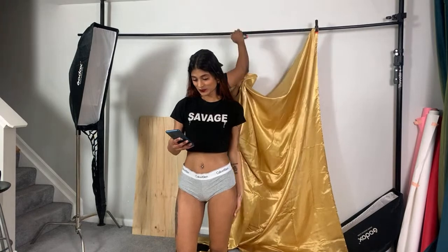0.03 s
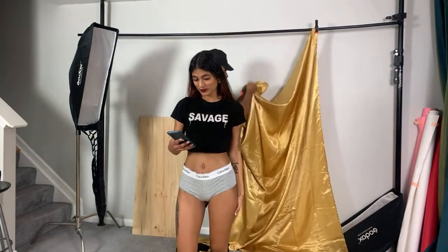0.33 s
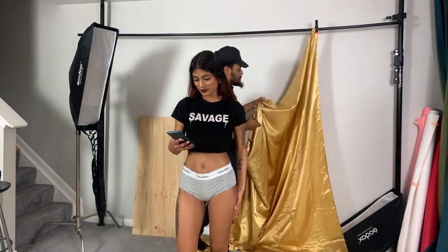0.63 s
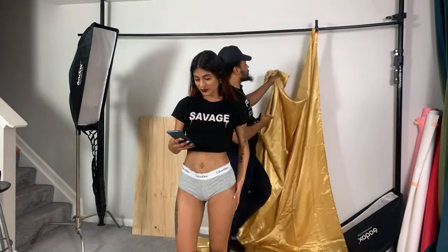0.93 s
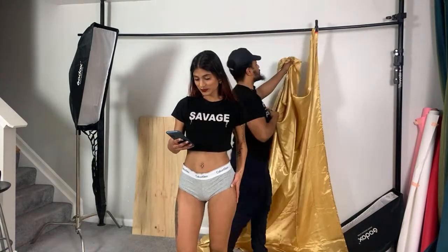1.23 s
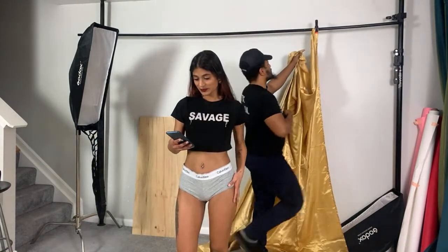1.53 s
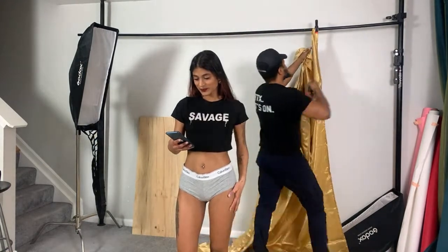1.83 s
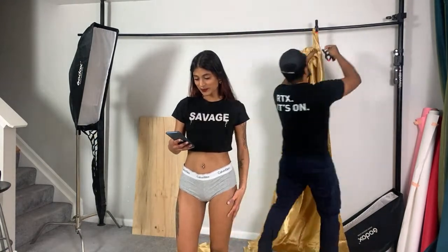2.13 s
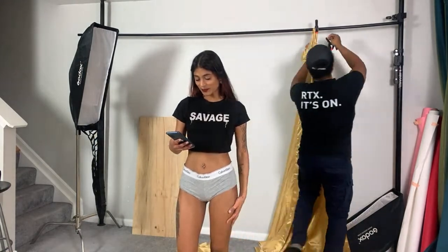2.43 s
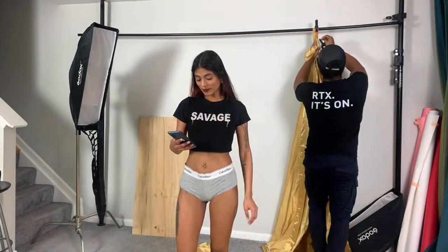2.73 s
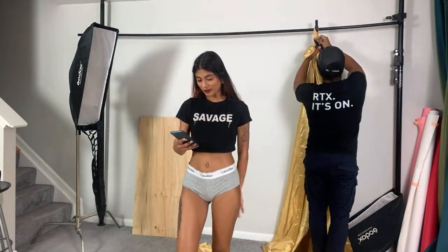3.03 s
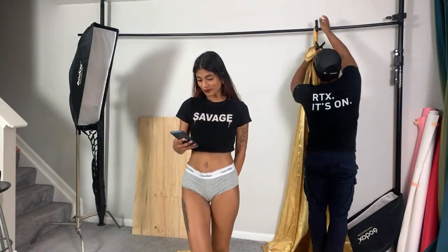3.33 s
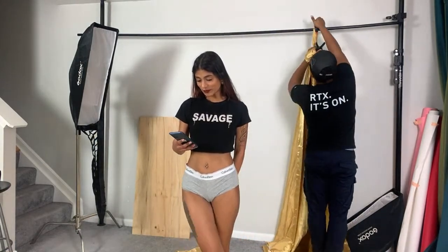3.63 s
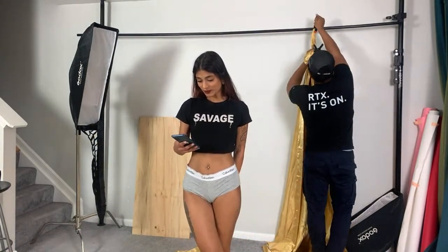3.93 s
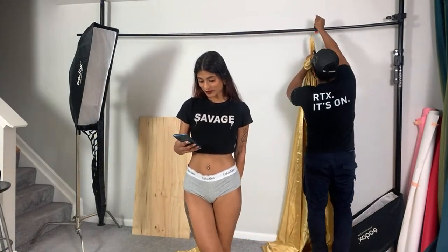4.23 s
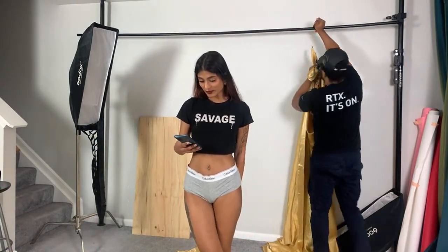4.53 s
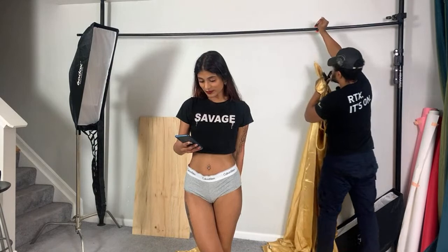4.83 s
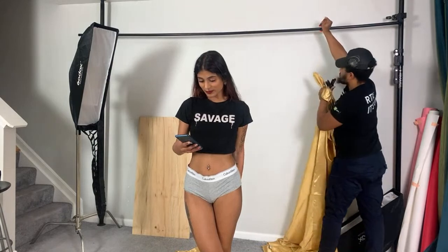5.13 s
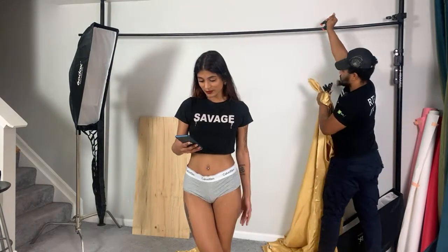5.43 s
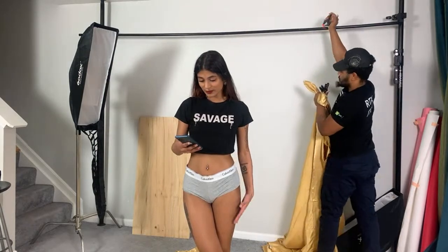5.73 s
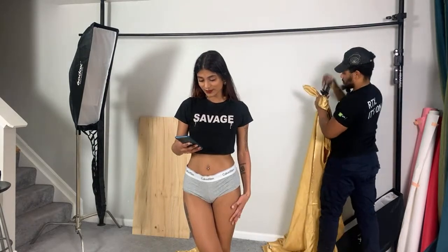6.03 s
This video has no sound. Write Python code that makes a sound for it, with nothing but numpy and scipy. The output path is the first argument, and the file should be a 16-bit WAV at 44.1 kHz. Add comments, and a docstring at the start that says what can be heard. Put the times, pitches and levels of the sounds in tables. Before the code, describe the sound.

A plastic spring clamp snaps shut with a bright crack and a brief ring. Much softer plastic clicks follow as clamps touch in a hand, with a few dull shoe scuffs and faint satin rustling. Later a metal crossbar knocks lightly in its brackets, and a quick double click comes at the end. It is heard from a few metres away in a small, bare room with quiet, steady ventilation.

```python
"""A plastic spring clamp snaps shut: a bright crack and a short ring as it comes off a backdrop's crossbar.
Loose clamps clack together in the hand, shoes scuff, and satin rustles as its tiny creases buckle.
The gripped metal bar squeaks under the palm, knocks in its brackets and hums low with each tug.
It all plays a few metres away in a small, bare studio, over a steady bed of ventilation."""
import sys
import numpy as np
from scipy import signal
from scipy.fft import rfft, irfft, next_fast_len
from scipy.io import wavfile

SR = 44100
rng = np.random.default_rng(int(sys.argv[2]) if len(sys.argv) > 2 else 0)


def store_pcm(level_fs):
    """Save levels as 16-bit WAV."""
    pcm = np.round(np.clip(level_fs, -1, 1) * 32767).astype(np.int16)
    wavfile.write(sys.argv[1], SR, np.atleast_2d(pcm).T)


N = 277697
T = np.arange(N) / SR
HIT_T = np.arange(SR // 2) / SR  # time axis of one hit

# the clamp scrapes off the bar and slams shut: t/s, relative level/dB, chatter/s, swell/s
SNAP_HITS = [(0.069, -30.5, 0.017, 0.0082), (0.098, 3, 0.0052, 0.017), (0.1055, -3, 0.006, 0.0003),
             (0.107, 6.5, 0.0042, 0.001), (0.1198, -6, 0.0057, 0.0018)]
# EQ of the crack: f/Hz, level/dB
SNAP_EQ = [(300, -43.5), (600, -20.5), (800, -21.5), (1100, -10.5), (1600, -21.5), (2000, -14),
           (2550, -7.5), (3200, -0.5), (3850, -7.5), (4400, -3.5), (6400, -9.5), (8200, -12), (10800, -18),
           (15500, -24)]
# ring of the sprung jaws: f/Hz, level/dB, t60/s
JAW_MODES = [(2590, -3.5, 0.077), (2770, -6, 0.098), (2880, -8, .11), (3110, -3, 0.15), (3175, 1.5, 0.11),
             (3300, -1, 0.17), (3421, -1.5, 0.14), (3390, -4, .25), (4330, -6, .24), (4645, -6.5, .24),
             (4940, -8.5, .22), (8200, -8, .008), (11914, -11, 0.0024)]
def snap(crack_db=-4, ring_db=-14):
    """The spring drives the jaws off the bar and together: a broad crack with a short ring."""
    out = np.zeros(N)
    for start, db, chatter, swell in SNAP_HITS:
        push = contact(chatter, swell)
        add_hit(out, start, db + crack_db, push, crack(SNAP_EQ))
        add_hit(out, start, db + ring_db, push, ring(JAW_MODES))
    return out


# clamps meet in the hand: t/s, level/dB, chatter/s, resonance f/Hz, boost/dB
CLACKS = [(.6795, -33.5, 0.0059, 5550, 13.5), (1.068, -36, 0.038, 4540, 0),
          (1.314, -33.5, 0.0062, 5540, 11.5), (1.516, -39.5, 0.007, 6000, 14),
          (1.556, -28.5, 0.0053, 8200, 13), (1.7048, -27, 0.015, 2900, -2), (1.7214, -18, 0.0074, 2800, 14),
          (1.7366, -19.5, 0.011, 3460, 5), (1.9864, -26, 0.06, 5740, 7), (2.053, -15.5, 0.018, 8850, 6),
          (3.0353, -42, 0.023, 3300, 6), (3.0812, -30, .02, 3150, 9.5), (3.655, -32.5, 0.013, 2143, 12),
          (3.7505, -38, 0.012, 3770, 1), (3.7823, -32, 0.018, 5670, 4), (5.7712, -31, 0.0078, 1890, 11.5),
          (6.222, -19.5, 0.0044, 3510, 5), (6.2306, -15.5, 0.0038, 5770, 5)]
# EQ of the plastic handles: f/Hz, level/dB
HANDLE_EQ = [(300, -14), (900, -7), (1500, 1), (2400, 4.5), (4000, 4.5), (6000, 0.5), (9000, -5),
             (15000, -1.5)]
def clacks(spread=1.16, swell_s=0.0035, soft_db=-32.5, soft_edge_hz=6060, db_per_octave=75):
    """Plastic handles touch; each hit favours one damped resonance, and harder hits are brighter."""
    out = np.zeros(N)
    for start, db, chatter, hz, boost_db in CLACKS:
        resonance = [(hz / spread, 0), (hz, boost_db), (hz * spread, 0)]
        edge_hz = soft_edge_hz * 2 ** ((db - soft_db) / db_per_octave)
        handle = eq(crack(HANDLE_EQ, edge_hz=edge_hz), resonance)
        add_hit(out, start, db, contact(chatter, swell_s), handle)
    return out


# the bar hits its brackets: t/s, relative level/dB, chatter/s, emphasis f/Hz, boost/dB
KNOCKS = [(4.181, -30, 0.0097, 2100, 2.5), (4.385, -24.5, 0.018, 3850, 6.5), (4.5049, -36, 0.054, 4980, 10),
          (4.6376, -36, 0.022, 3820, 0), (4.736, -43, .02, 3790, 8), (5.112, -22.5, 0.014, 1960, 0),
          (5.278, -33.5, .014, 4560, 6)]
# ring of the metal tube: f/Hz, level/dB, t60/s
BAR_MODES = [(559, 5, .25), (1060, 3.5, 0.19), (1346, -1.5, 0.14), (1800, 1.5, 0.13), (1960, 3, 0.25),
             (3140, -16, 0.13), (3737, -12, 0.45), (3900, -15, 0.28), (4180, -20, .2), (4800, -18, 0.27),
             (10550, -27, .25), (10800, -24, .25)]
# EQ of the tube's body, for knocks and squeaks: f/Hz, level/dB
BAR_EQ = [(200, -3.5), (1000, 4), (2000, 0.5), (2700, -11), (4000, -5), (5200, -14), (7000, -27),
          (15000, -47)]
def knocks(crack_db=-2, ring_db=-2, swell_s=0.008, spread=1.54):
    """The tube rattles in its bracket and rings; the spot that is hit decides which modes speak."""
    out = np.zeros(N)
    for start, db, chatter, hz, boost_db in KNOCKS:
        spot = [(hz / spread, 0), (hz, boost_db), (hz * spread, 0)]
        add_hit(out, start, db + crack_db, contact(chatter, swell_s), eq(crack(BAR_EQ), spot))
        add_hit(out, start + swell_s, db + ring_db, crack(spot), ring(BAR_MODES))
    return out


# the palm slides on the bar: t/s, level/dB, length/s, start f/Hz, end f/Hz
SQUEAKS = [(3.948, -37.5, 0.0416, 4700, 4170)]
def squeaks(jitter=0.518):
    """Skin sticks and slips on the tube in a rough, falling chirp."""
    out = np.zeros(N)
    for start, db, length, start_hz, end_hz in SQUEAKS:
        progress = np.minimum(HIT_T / length, 1)
        glide_hz = start_hz + (end_hz - start_hz) * progress
        rough_hz = glide_hz * (1 + jitter * rng.standard_normal(len(HIT_T)))
        chirp = np.sin(2 * np.pi * np.cumsum(rough_hz) / SR) * np.sin(np.pi * progress)
        add_hit(out, start, db, chirp, crack(BAR_EQ))
    return out


# the hand tugs at the bar: t/s, upper mode level/dB, lower mode level/dB
TUGS = [(3.79, -54.5, -73), (3.97, -58.5, -78), (4.17, -63.5, -64), (4.431, -61, -64.5), (4.62, -66, -67),
        (4.72, -70, -63.5), (4.86, -62.5, -82), (5.02, -60, -75), (5.24, -62.5, -70), (5.39, -63.5, -69),
        (5.68, -62, -60.5), (5.96, -66, -81)]
def bar_hum(upper_hz=148, lower_hz=117, rise_s=0.062, t60_s=0.82, waver_rad=0.85):
    """Each tug swells two bending modes of the bar, which then die away under the hand."""
    starts, upper_db, lower_db = np.transpose(TUGS)
    age = T - starts[:, None]
    attack = np.sin(np.pi / 2 * np.clip(age / rise_s, 0, 1))
    swings = attack * decay(np.maximum(age - rise_s, 0), t60_s)
    out = np.zeros(N)
    for hz, db in ((upper_hz, upper_db), (lower_hz, lower_db)):
        bend = np.sqrt(2) * np.sin(2 * np.pi * hz * T + waver_rad * noise_band(0, width_hz=9.9))
        out += bend * np.sqrt(undb(db) ** 2 @ swings ** 2)  # tugs add in power
    return out


# footfalls: t/s, level/dB, scuff/s, tilt/(dB per octave)
STEPS = [(1.1, -20, 0.062, -2), (1.555, -26, 0.031, -1), (2.258, -25, 0.015, 0)]
# EQ of a sole on the floor: f/Hz, level/dB
SOLE_EQ = [(60, -17), (160, 0), (280, 0.5), (550, -4), (1100, -3.5), (1700, -10), (2500, -20), (4000, -26),
           (10000, -49)]
def steps():
    """Soft soles scuff the floor in short, dull bursts."""
    out = np.zeros(N)
    for start, db, scuff, tilt_db in STEPS:
        add_hit(out, start, db, contact(scuff), crack(SOLE_EQ, tilt_db))
    return out


# the satin is swept along or gathered: peak t/s, relative level/dB, length/s
PULLS = [(0.299, -76, 0.16), (0.675, -73.5, 0.18), (0.958, -72.5, .11), (1.124, -74, 0.18),
         (1.479, -75.5, 0.3), (2.169, -74, 0.35), (2.9, -82.5, .16), (3.9, -78.5, 0.31), (4.573, -78, .2),
         (5.02, -78.5, 0.19), (5.303, -84.5, 0.32)]
# EQ of the rustle: f/Hz, level/dB
SATIN_EQ = [(400, -13), (1200, 3.5), (3000, -1), (5000, -10.5), (7500, -16.5), (15000, -25.5)]
def satin(creases_per_s=1200, size_spread_db=3, held_db=-85.5, trim_db=-1):
    """Countless small creases buckle, swelling with each pull and stirring faintly in between."""
    sizes = undb(size_spread_db * np.minimum(rng.exponential(size=N), 3))
    creases = (rng.random(N) < creases_per_s / SR) * rng.standard_normal(N) * sizes
    pull_power = sum(undb(db) ** 2 * np.exp(-(2 * (T - peak) / length) ** 2)
                     for peak, db, length in PULLS)
    rustle = level(eq(creases, SATIN_EQ), trim_db) * np.sqrt(undb(held_db) ** 2 + pull_power)
    return signal.fftconvolve(rustle, room())[:N]


# EQ of the low airflow: f/Hz, level/dB
AIR_EQ = [(30, -28), (48, -14.5), (60, -5.5), (90, -9.5), (140, -4), (175, -5.5), (240, -0.5), (350, -8),
          (430, -6.5), (640, -10.5), (740, -11), (1030, -9.5), (1250, -25.5), (1800, -47.5)]
# duct resonances: f/Hz, level/dB
DUCT_TONES = [(220, -76), (243, -79), (722, -77)]
# EQ of the hiss: f/Hz, level/dB
HISS_EQ = [(700, -18.5), (1100, -2.5), (1450, 1.5), (2000, -7.5), (3000, -23), (5000, -23), (9000, -26),
           (15500, -31)]
def ventilation(air_db=-63, hiss_db=-75.5, waver_db=1.5):
    """A bed of low moving air with a few duct resonances and a faint, even hiss."""
    air = level(eq(rng.standard_normal(N), AIR_EQ), air_db)
    air *= undb(waver_db * noise_band(0, width_hz=7.2))
    ducts = sum(undb(db) * noise_band(hz, width_hz=14) for hz, db in DUCT_TONES)
    hiss = level(eq(rng.standard_normal(N), HISS_EQ), hiss_db)
    return air + ducts + hiss


# early reflections off floor, ceiling and walls: delay t/s, level/dB against the direct sound
ECHOES = [(0.0104, -5), (.013, -2.5), (0.021, -7.5), (0.0312, -11), (.049, -13)]
# reverb time by band: f/Hz, t60/s
ROOM_T60 = [(150, 0.45), (1000, 0.27), (4000, 0.28), (7000, 0.24), (11000, 0.22), (16000, 0.052)]
def room(tail_db=0.5, build_s=0.0075):
    """Direct sound, early reflections and a diffuse tail whose treble dies first; new for each spot."""
    noise = rfft(rng.standard_normal(len(HIT_T)))
    hz = np.arange(len(noise)) * SR / len(HIT_T)
    centres_hz, t60s = np.transpose(ROOM_T60)
    tail = 0
    for t60, solo in zip(t60s, np.eye(len(t60s))):
        band = at_hz(np.c_[centres_hz, solo], hz)
        tail = tail + irfft(noise * band, len(HIT_T)) * decay(HIT_T, t60)
    response = undb(tail_db) * unit(tail * (1 - np.exp(-HIT_T / build_s)))
    response[0] += 1
    for delay, db in ECHOES:
        response[int(delay * SR)] += undb(db)
    return unit(response)


def add_hit(out, start_s, db, push, body):
    """A push rings a body and the room carries it; db sets the energy of the whole hit."""
    struck = signal.fftconvolve(push, body)[:len(HIT_T)]
    sound = signal.fftconvolve(struck, room())
    start = int(start_s * SR)
    hit = undb(db) * unit(sound)[:N - start]
    out[start:start + len(hit)] += hit


def contact(chatter_s, swell_s=0.00095, grain_db=5, touch=0.61, soft_s=0.0019):
    """A first touch, weaker for a slow approach, then a chatter of tiny slips that swells and dies."""
    t = HIT_T[:len(HIT_T) // 4]
    slips = rng.standard_normal(len(t))
    slips *= undb(grain_db * np.clip(rng.standard_normal(len(t)), -2, 2))
    chatter = unit(slips * (1 - np.exp(-t / swell_s)) ** 2 * np.exp(-2 * t / chatter_s))
    first_touch = touch * np.exp(-swell_s / soft_s) * (t == 0)
    return first_touch + chatter


def crack(curve, tilt_db=0, edge_hz=SR):
    """Short broadband response of a stiff part."""
    impulse = 1. * (HIT_T == 0)
    return unit(eq(impulse, curve, tilt_db, edge_hz))


def ring(modes):
    """Decaying modes of a struck part; each level sets that mode's share of the energy."""
    return unit(sum(undb(db) / np.sqrt(t60) * np.sin(2 * np.pi * hz * HIT_T) * decay(HIT_T, t60)
                    for hz, db, t60 in modes))


def noise_band(hz, width_hz):
    """A resonance stirred at random, rms 1; at 0 Hz it is a slow wobble."""
    n = 2 * next_fast_len(N // 2 + 1)
    f = np.arange(n // 2 + 1) * SR / n
    spectrum = rfft(rng.standard_normal(n)) / (1 + ((f - hz) / width_hz * 2) ** 2)
    return level(irfft(spectrum)[:N], 0)


def eq(x, curve, tilt_db=0, edge_hz=SR, size=4096):
    """Apply an EQ curve, a tilt per octave about 2 kHz and a treble roll-off."""
    hz = np.arange(size // 2 + 1) * SR / size
    db = at_hz(curve, hz) + tilt_db * np.log2((hz + 100) / 2000)
    db -= 10 * np.log10(1 + (hz / edge_hz) ** 8)
    # minimum phase keeps attacks sharp
    cepstrum = irfft(np.log(undb(db)))
    cepstrum[1:size // 2] *= 2
    cepstrum[size // 2 + 1:] = 0
    response = irfft(np.exp(rfft(cepstrum)))
    return signal.fftconvolve(x, response)[:len(x)]


def at_hz(curve, hz):
    """Read a curve on a log frequency axis."""
    f, value = np.transpose(curve)
    return np.interp(np.log(hz + 1), np.log(f), value)


def decay(t, t60):
    """Envelope that falls 60 dB in t60 seconds."""
    return np.exp(-np.log(1000) * t / t60)


def level(x, db):
    """Scale to an rms level."""
    return unit(x) * np.sqrt(len(x)) * undb(db)


def unit(x):
    """Scale to unit energy."""
    return x / np.sqrt(np.sum(x ** 2))


def undb(db):
    """Decibels to gain."""
    return 10 ** (np.asarray(db) / 20)


def scene():
    """Clamps, crossbar, feet, cloth and air, mixed at one microphone."""
    return (snap() + clacks() + knocks() + squeaks() + bar_hum() + steps() + satin() + ventilation())[None]


def record(dry, low_cut_hz=50, high_cut_hz=15800):
    """The recorder cuts the deep bass and the top."""
    low_cut = signal.butter(3, low_cut_hz, "high", fs=SR, output="sos")
    high_cut = signal.ellip(10, .2, 70, high_cut_hz, fs=SR, output="sos")
    return signal.sosfilt(high_cut, signal.sosfilt(low_cut, dry))


dry = scene()
out = record(dry)
store_pcm(out)
```